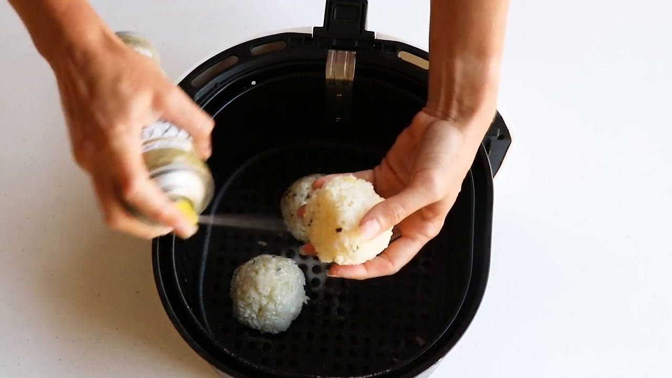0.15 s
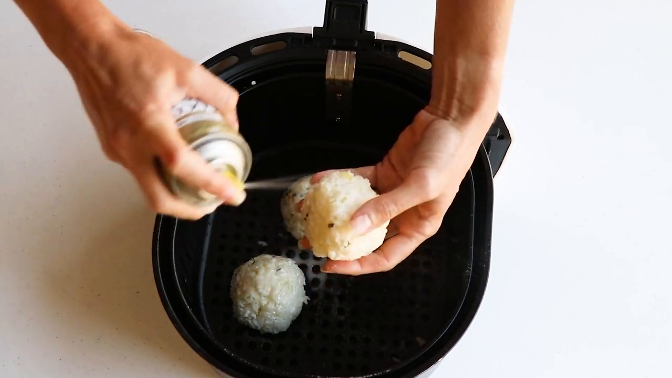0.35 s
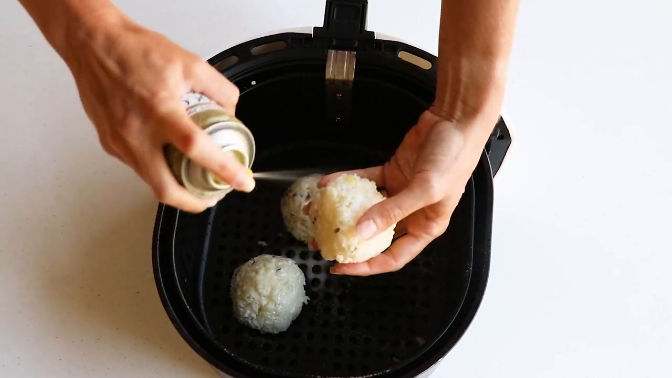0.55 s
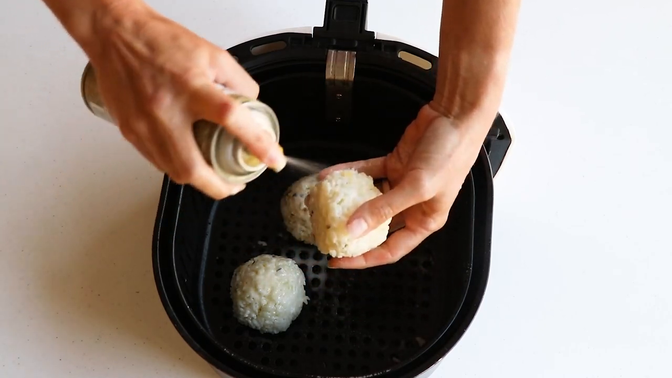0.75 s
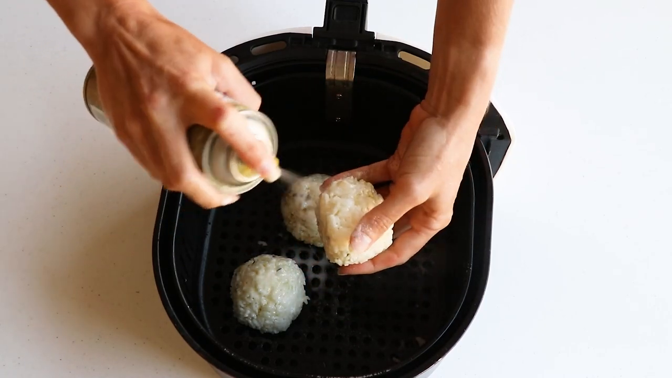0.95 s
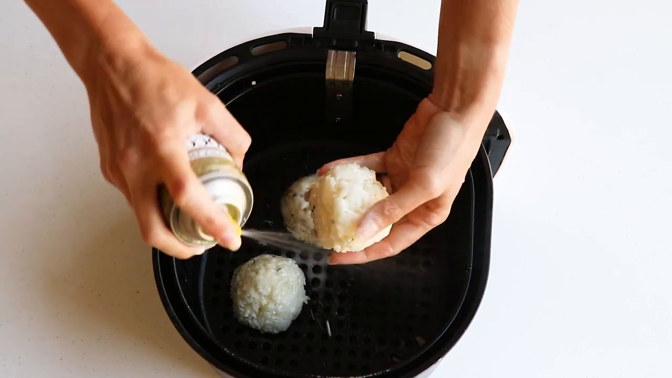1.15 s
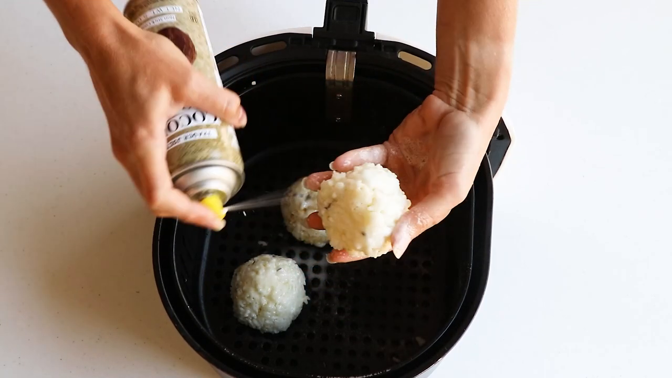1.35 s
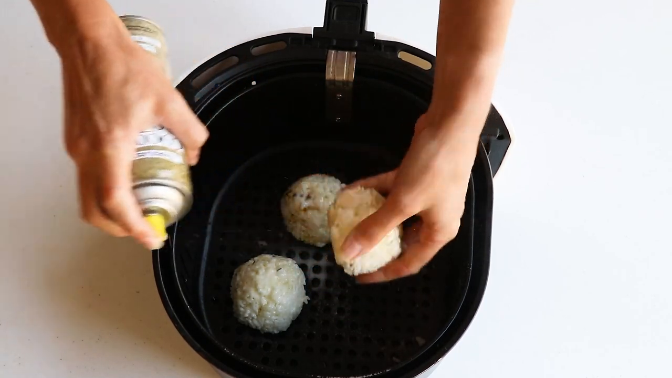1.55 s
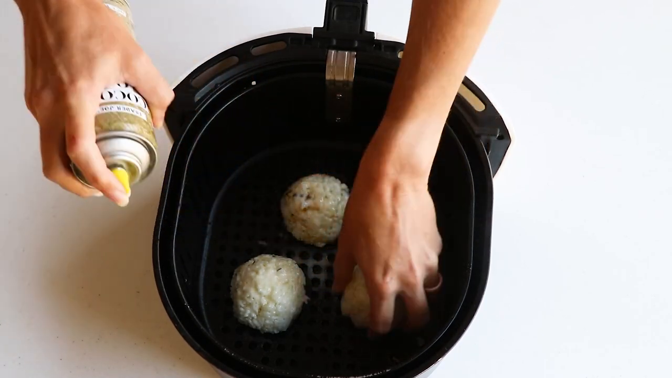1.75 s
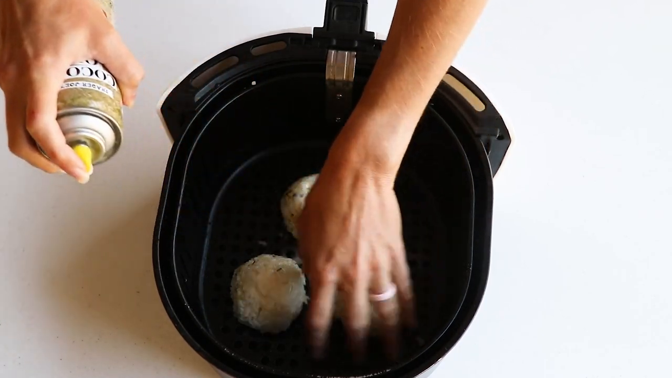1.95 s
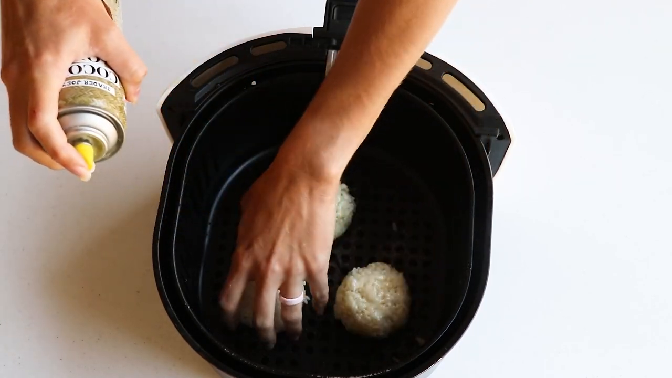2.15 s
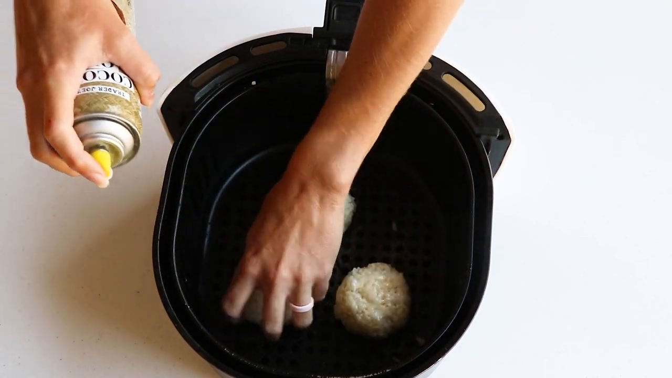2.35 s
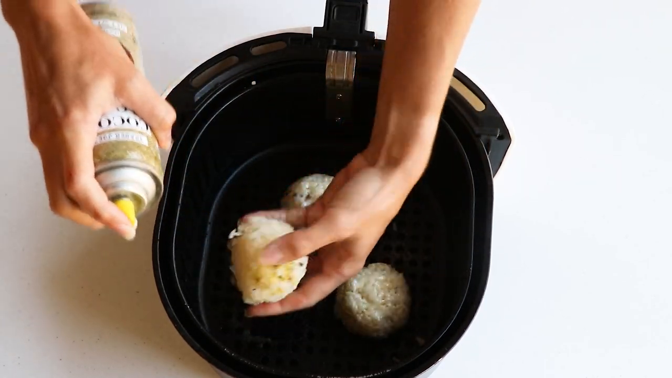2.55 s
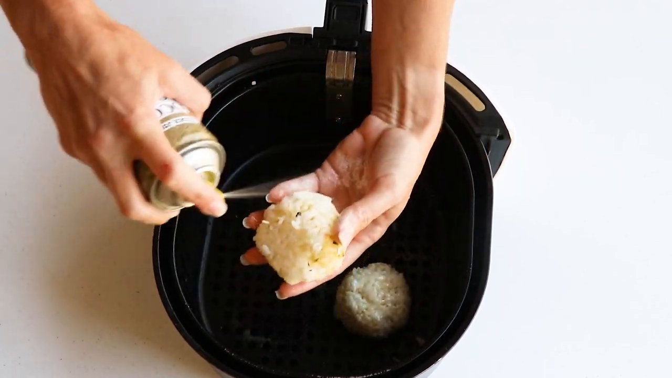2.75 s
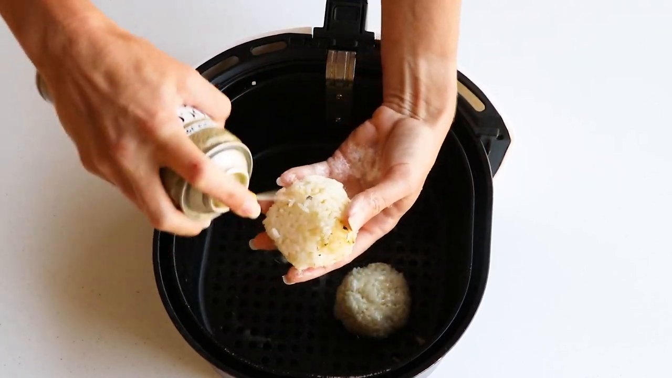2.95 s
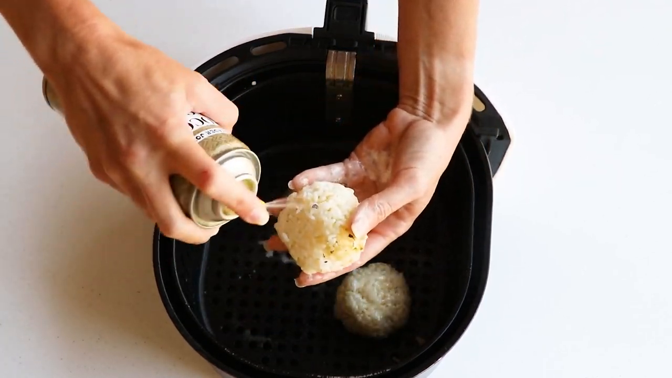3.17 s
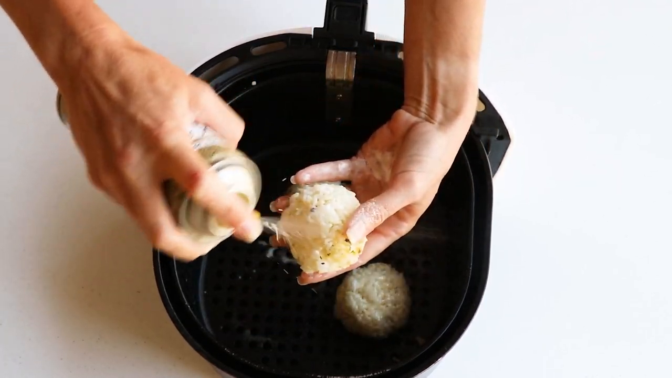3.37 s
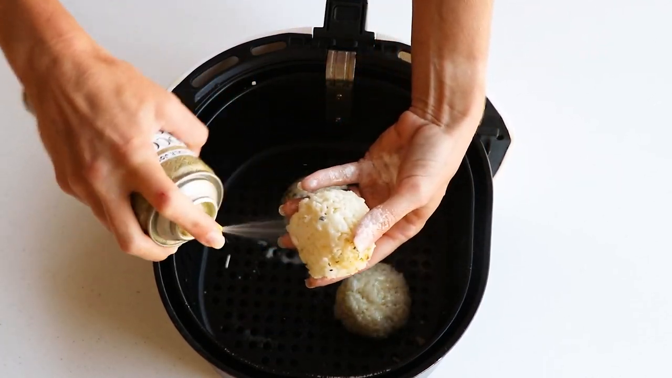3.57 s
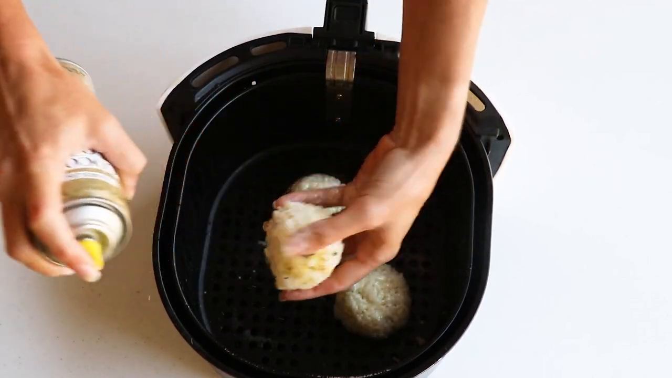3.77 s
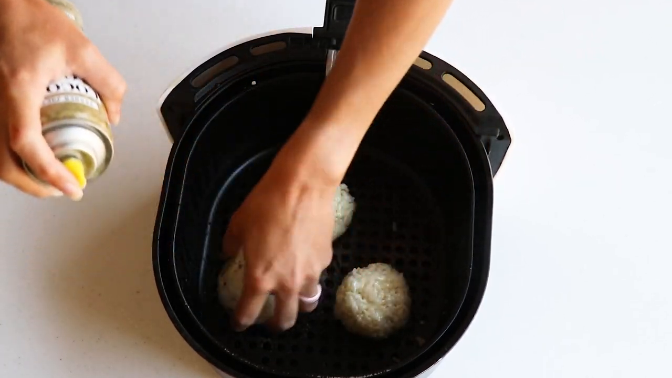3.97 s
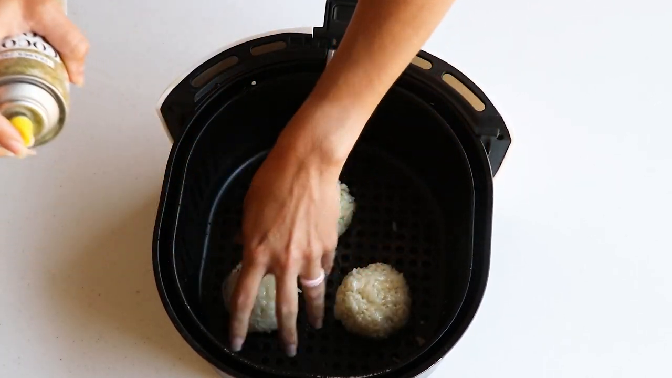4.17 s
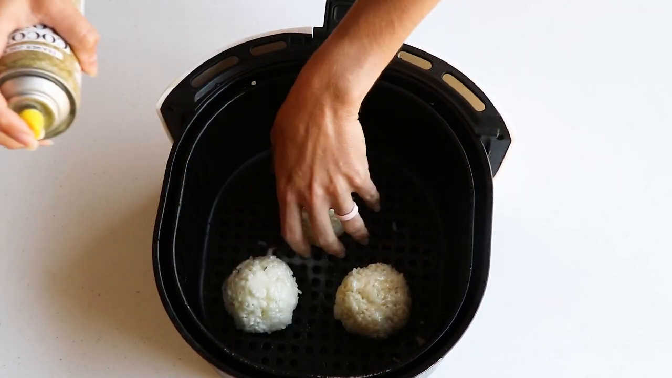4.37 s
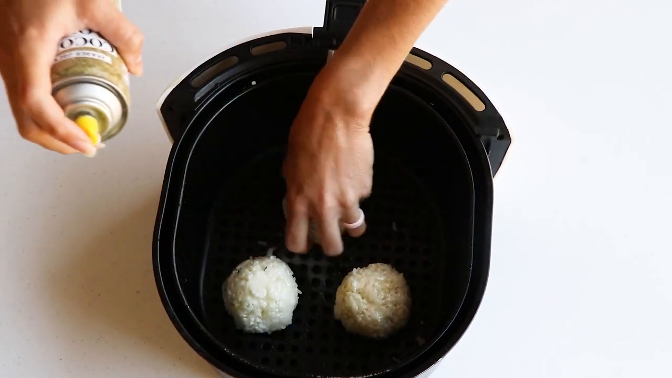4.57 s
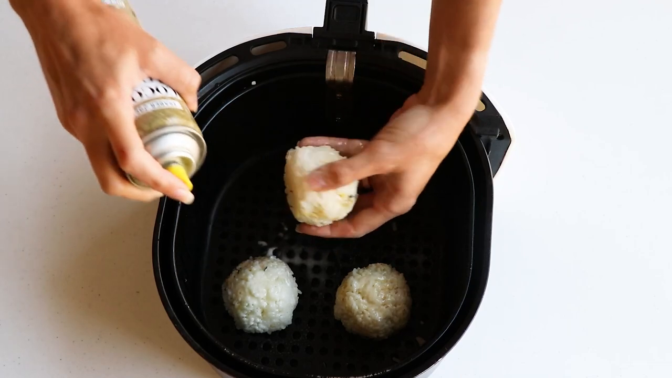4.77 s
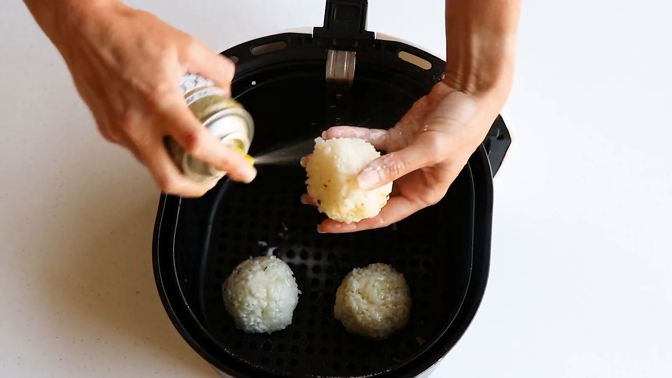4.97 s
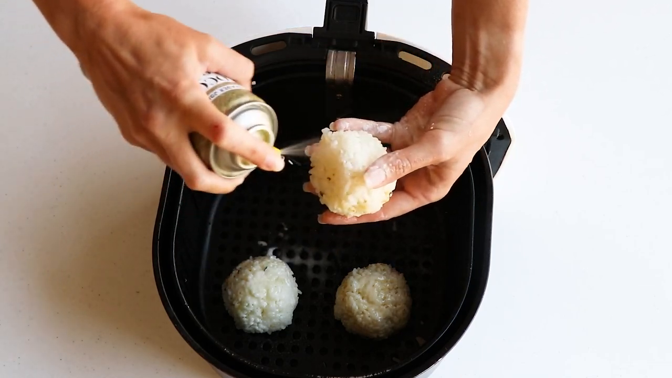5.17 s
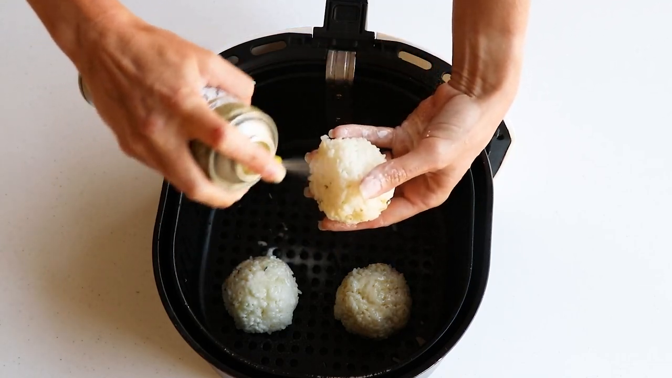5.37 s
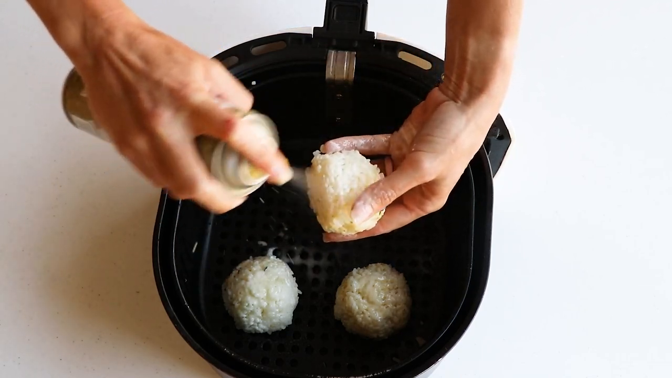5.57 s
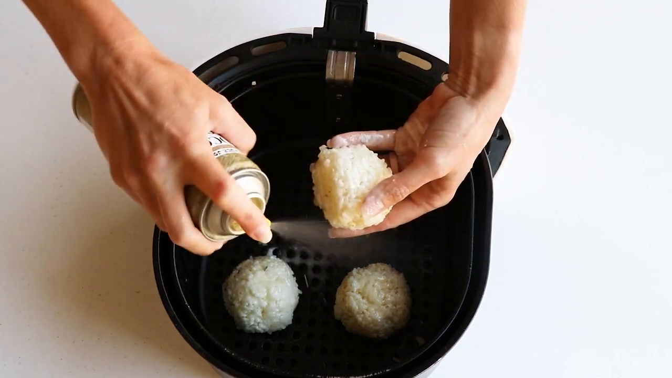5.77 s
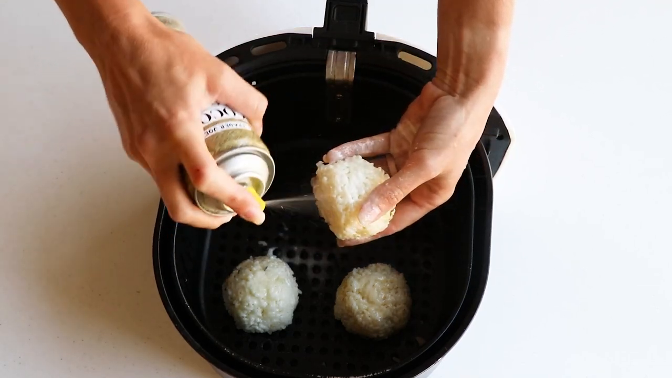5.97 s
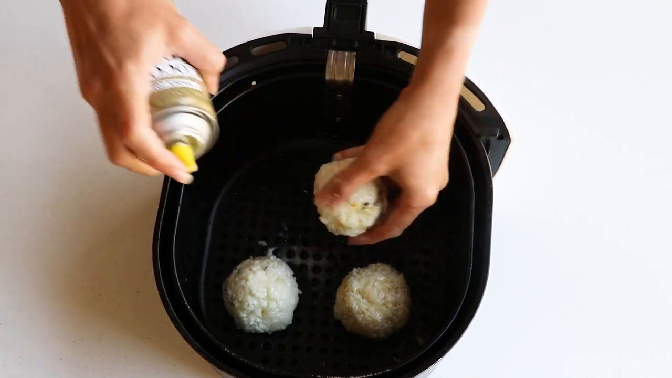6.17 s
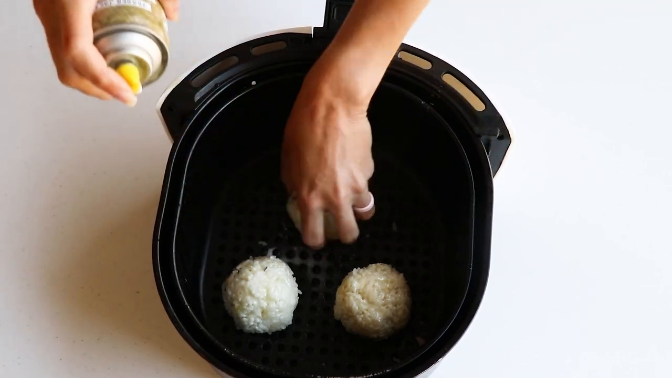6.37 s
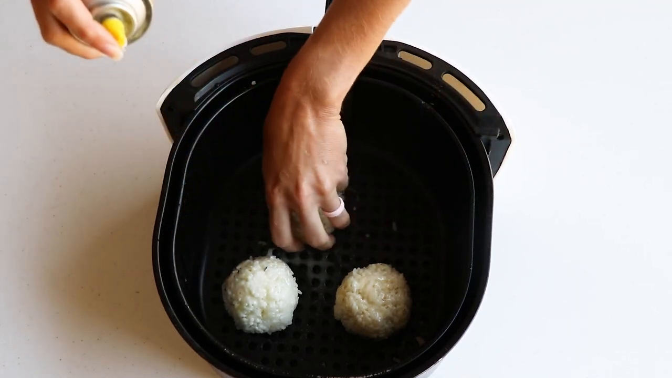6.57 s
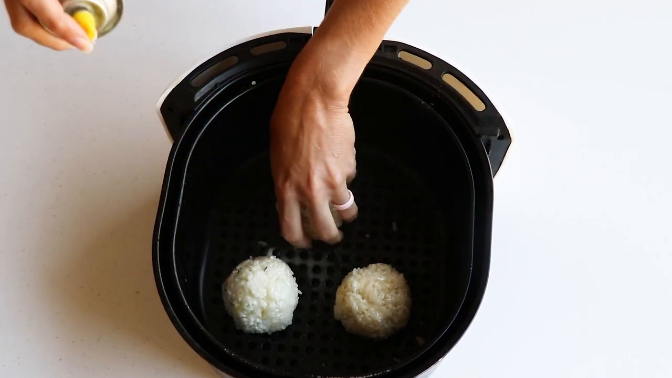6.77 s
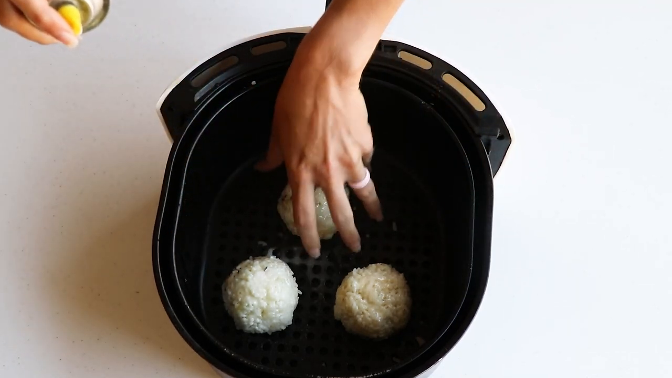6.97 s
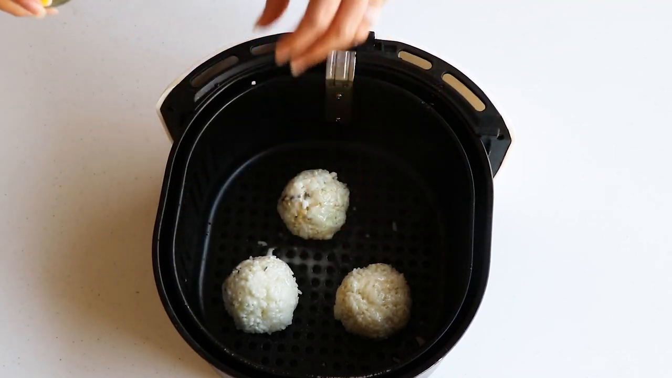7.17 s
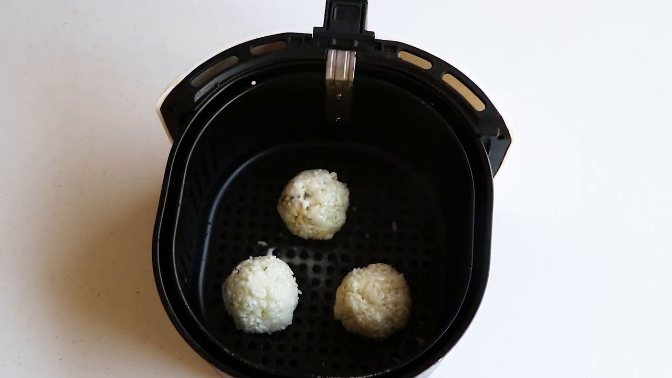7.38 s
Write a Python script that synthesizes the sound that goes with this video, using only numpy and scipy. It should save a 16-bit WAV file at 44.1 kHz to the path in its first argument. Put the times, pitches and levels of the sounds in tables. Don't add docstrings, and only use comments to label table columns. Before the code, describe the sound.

Close up, an aerosol can of cooking oil sprays three times, a bright hiss broken by wet sputters and hollow tube gurgles. After each spray, rice balls set down make the loose metal tray knock, crack and rattle against the basket. The last knocks fade into a faint, oily finger rub. A fridge hums low throughout in a small hard-walled kitchen, lightly reverberant, with a close stereo microphone.

```python
import sys
import numpy as np
from scipy import signal
from scipy.fft import rfft, irfft, next_fast_len
from scipy.io import wavfile
from scipy.ndimage import uniform_filter1d, map_coordinates

SR = 44100
rng = np.random.default_rng(int(sys.argv[2]) if len(sys.argv) > 2 else 0)


def output_pcm(signal):
    pcm = np.clip(np.atleast_2d(signal).T, -1, 1) * 32767
    wavfile.write(sys.argv[1], SR, np.round(pcm).astype(np.int16))


def amplitude_ratio(level_db):
    exponent = np.asarray(level_db, float) / 20
    return 10 ** exponent


N = 327663
TIME = np.arange(N) / SR
FAST_N = next_fast_len(N)

# (opens [s], shuts [s], jet hiss [dB], steady gurgle [dB], closing t60 [s])
PRESSES = [
    (0.024, 1.61, -31.5, -47.5, 0.27),
    (2.741, 3.747, -32, -45.5, 0.2),
    (4.938, 6.17, -32, -48, .17),
]
# (time [s], peak level [dB], length [s], extra bottom [dB])
SLUGS = [(0.033, -35.5, 0.039, -10), (0.103, -29.5, 0.022, -9), (0.2, -33.5, 0.013, -2),
         (0.2415, -31.5, 0.016, -5), (0.388, -30, 0.011, 0), (1.002, -27, 0.053, 2.5),
         (1.066, -27, 0.024, 4.5), (1.14, -27.5, 0.053, -1), (1.188, -32, 0.028, 9.2),
         (1.283, -29, 0.045, 6.5), (1.4, -49, 0.021, -5), (1.527, -29.5, 0.028, 9), (1.621, -40, 0.04, -8),
         (2.75, -34.5, 0.038, -7), (2.87, -30.5, 0.01, 4), (3.351, -28.5, 0.064, 2.5),
         (3.465, -26.5, 0.037, 2), (3.524, -26.5, 0.026, 3), (3.549, -27, 0.051, 2.5),
         (3.644, -30, 0.021, 1), (3.744, -33.5, 0.031, 5),
         (4.945, -32.5, 0.037, -1), (4.98, -27, 0.022, 3), (5.039, -31.5, 0.017, -14),
                (5.091, -27, 0.041, 6.5), (5.149, -30.5, 0.023, -6), (5.225, -28, 0.058, 2.5),
                (5.342, -29.5, 0.032, 5), (5.424, -28, 0.068, 1), (5.519, -26.5, 0.012, -16),
                (5.574, -29, 0.064, 3.5), (5.66, -27.5, 0.054, -8), (5.802, -29, 0.06, -11),
                (5.85, -30, 0.056, 3.5), (5.92, -25.5, 0.024, 4), (6.02, -34, 0.1, 1.5),
                (6.143, -34, 0.032, 7.5)]
# (time [s], peak level [dB], length [s])
GAS_PUFFS = [
    (1.002, -29, .012),
    (1.4, -38, 0.036),
    (1.792, -50, .006),
    (4.946, -34, .01),
    (5.66, -27, 0.034),
]
# (frequency [Hz], level per Hz [dB])
JET_SPECTRUM = [(900, -52), (1500, -21), (2060, -11), (2770, -11.5), (3660, -8.5), (4240, -5.5), (6060, -2),
                (8740, -0.5), (9700, -6), (11100, -8), (12500, -4.5), (14000, 0), (15700, -2)]
# (frequency [Hz], width [Hz], lift above the hiss [dB])
NOZZLE_WHISTLES = [(9130, 1380, 8.5), (4250, 160, 1.5), (7400, 430, 2)]
# (frequency [Hz], level per Hz [dB])
SPUTTER_SPECTRUM = [(240, -55), (400, -9.5), (1030, -8.5), (1460, -7), (1820, -3.5), (4240, 2), (5030, 2),
                    (8760, -6.5), (16000, -4)]
# (frequency [Hz], width [Hz], lift above the gurgle [dB])
TUBE_RESONANCES = [(765, 660, 8.5), (1457, 246, 9), (2050, 310, 8.5), (2864, 53, 7.5), (3260, 68, 8.5),
                   (3910, 750, 4), (4530, 250, 4.5), (5500, 190, -1), (6000, 250, 6), (7050, 300, 4.5)]
# (time [s], peak level [dB], fade t60 [s], hardness as extra top [dB],
# basket mode nearest the blow [Hz])
KNOCKS = [(1.761, -40, 0.28, 2, 296), (1.9, -38, 0.15, 5, 490), (1.968, -45.5, 0.15, 7, 536),
          (2.3032, -25, 0.16, 4, 630), (2.323, -27.5, 0.087, 2, 820), (2.348, -31.5, 0.43, -5, 401),
          (2.4074, -38.5, 0.13, 2, 834), (2.4444, -45, 0.22, -5, 358), (4.0392, -44.5, 0.12, -7, 295),
          (4.0794, -49, 0.15, -2, 293), (4.13, -36, 0.22, 2.5, 331), (4.2474, -50.5, 0.13, 6, 307),
          (4.514, -21.5, 0.061, 5, 500), (4.5416, -27.5, 0.14, -1.5, 310), (4.575, -28, 0.23, 2.5, 514),
          (4.658, -34, 0.14, -3.5, 305), (4.6994, -47, 0.2, -14, 310), (6.3869, -52, 0.04, 8, 495),
          (6.458, -27, 0.092, 2.5, 494), (6.49, -32.5, 0.26, -5, 460), (6.558, -50, 0.3, -7, 522)]
# (frequency [Hz], level per Hz [dB])
CRACK_SPECTRUM = [(120, -40), (400, -9), (900, 4), (1850, 3), (3260, 0.5), (5500, -3.5), (8700, -7),
                  (10000, -15), (15500, -36)]
# (frequency [Hz], level [dB], t60 [s])
TRAY_MODES = [(1454, -14.5, 0.063), (2070, -27, 0.055), (2600, -20, 0.032), (3230, -21, 0.035),
              (3750, -34, .04), (4340, -23, 0.034), (4890, -17, .04), (5560, -12, 0.024), (7150, -30, .04)]
# (frequency [Hz], level [dB], t60 [s])
BASKET_MODES = [(212, 0.5, 0.24), (310, 1, 0.13), (412, -6, 0.13), (460, -9, 0.29), (520, 2, 0.083),
                (643, 5, 0.024), (830, 2.5, 0.13), (1046, -27, 0.065), (1126, -1, 0.22)]
# (time [s],
# frequency [Hz], level [dB], t60 [s])
PINGS_AND_RUMBLES = [(2.322, 2600, -39, 0.039), (2.322, 830, -49, 0.12), (2.35, 2600, -41, 0.078),
                     (2.40, 830, -47, 0.39), (4.133, 2620, -55, .08), (4.518, 2600, -39, .05),
                     (4.52, 678, -36, 0.11), (4.524, 830, -34, .1), (4.539, 460, -38, 0.092),
                     (4.575, 5500, -39, .04), (6.1, 4430, -33, .04), (4.585, 3750, -40, .07),
                     (6.482, 520, -37.5, 0.044), (2.33, 38, -51, .8), (4.53, 44.8, -51, .7),
                     (6.501, 32.1, -47, 0.55), (6.545, 520, -42, 0.12)]
# (time [s], level [dB])
FINGER_RUB = [
    (6.85, -81),
    (6.908, -76),
    (7.044, -60.5),
    (7.384, -65),
    (7.422, -60),
    (7.43, -78),
]
# (frequency [Hz], t60 [s])
KITCHEN_T60 = [(200, 0.94), (1000, 0.61), (5000, 0.48), (14000, 0.16)]
# (frequency [Hz], level per Hz [dB])
AIR_SPECTRUM = [(12, -35), (20, -7.5), (59, -6), (90, -5), (151, -7.5), (229, 0.5), (347, -1.5), (484, -6),
                (700, -8), (1080, -13), (1550, -16), (2340, -22.5), (8000, -24.5), (15000, -26)]
# (frequency [Hz], rms level [dB])
FRIDGE_HUM = [(59.2, -61.5), (177.6, -65), (269.2, -79), (296.1, -64), (355.3, -58.5), (414.5, -65),
              (484.5, -63), (532.9, -61.5), (716.0, -62)]


def rms_one(x):
    return x / np.sqrt(np.mean(x ** 2) + 1e-20)


def at_hz(points, hz):
    point_hz, values = np.transpose(points)
    return np.interp(np.log(hz + 1), np.log(point_hz), values)


def coloured(spectrum, peaks=(), source=None):
    hz = np.fft.rfftfreq(FAST_N, 1 / SR)
    lift_db = sum(db / (1 + (2 * (hz - peak_hz) / width) ** 2) for peak_hz, width, db in peaks)
    source = rng.standard_normal(FAST_N) if source is None else source
    shaped = rfft(source, FAST_N) * amplitude_ratio(at_hz(spectrum, hz) + lift_db)
    return rms_one(irfft(shaped, FAST_N)[:N])


def filtered(x, order, hz, kind="low"):
    return signal.sosfilt(signal.butter(order, hz, kind, fs=SR, output="sos"), x)


def drift(rate_hz):
    r = np.exp(-2 * np.pi * rate_hz / SR)
    wander = signal.lfilter([1], [1, -2 * r, r * r], rng.standard_normal(N + SR))
    return rms_one(wander[SR:])


def burst(s, length, t60, rise):
    shape, start = np.zeros(N), round(s * SR)
    age = TIME[:min(SR // 2, N - start)]
    fade = amplitude_ratio(-60 * np.maximum(age - length, 0) / max(t60, 0.005))
    shape[start:start + len(age)] = np.clip(age / rise, 0, 1) * fade
    return shape


def bursts(rows, noise, split_hz, rise):
    low = filtered(noise, 2, split_hz[0])
    high = filtered(noise, 2, split_hz[1], "high")
    rows = np.array(rows)
    shapes = np.array([burst(s, length, t60, rise) for s, _, length, t60 in rows[:, :4]]) ** 2
    peak_db, top_db, bottom_db = rows[:, 1], rows[:, 4], rows[:, 5]
    thirds_db = peak_db + [bottom_db, 0 * bottom_db, top_db]
    gains = np.sqrt(amplitude_ratio(thirds_db) ** 2 @ shapes)
    return gains[0] * low + gains[1] * (noise - low - high) + gains[2] * high


def ring(drive, modes):
    out = 0
    for hz, db, t60 in modes:
        r, w = amplitude_ratio(-60 / (t60 * SR)), 2 * np.pi * hz / SR
        push = [0, amplitude_ratio(db) * np.sin(w)]
        out = out + signal.lfilter(push, [1, -2 * r * np.cos(w), r * r], drive + 1e-18)
    return out


def spitting(per_s, spread_db):
    hits = rng.random(N) < per_s / SR
    sizes = amplitude_ratio(spread_db * np.minimum(rng.exponential(1, N), 3))
    drops = hits * sizes * rng.choice([-1, 1], N)
    return rng.standard_normal(N) + drops


def patchy(x, depth_db, frames, bins):
    cells = signal.stft(x, nperseg=512)[2]
    swell = uniform_filter1d(rng.standard_normal(cells.shape), size=bins, axis=0)
    swell = uniform_filter1d(swell, size=frames, axis=1)
    return rms_one(signal.istft(cells * amplitude_ratio(depth_db * rms_one(swell)), nperseg=512)[1][:N])


def valve(column, grows_db_per_s=0, t60=None):
    open_s, closing_curve = 0.01, 1.4
    gain = 0
    for row in PRESSES:
        opens, shuts = row[:2]
        held_db = row[column] + grows_db_per_s * (np.clip(TIME, opens, shuts) - (opens + shuts) / 2)
        closing_db = -60 * (np.maximum(TIME - shuts, 0) / (t60 or row[4])) ** closing_curve
        gain = gain + np.clip((TIME - opens) / open_s, 0, 1) ** 2 * amplitude_ratio(held_db + closing_db)
    return gain


def slug_rows():
    fade_s, fade_per_length, top_db = 0.029, 1.8, 0.5
    return [(s, db, length, fade_s + fade_per_length * length, top_db, bottom_db)
            for s, db, length, bottom_db in SLUGS]


def jet():
    hiss = coloured(JET_SPECTRUM, NOZZLE_WHISTLES, spitting(per_s=2100, spread_db=-2.0))
    hiss = patchy(hiss, depth_db=1.86, frames=6, bins=10)
    hiss = patchy(hiss, depth_db=1.7, frames=16, bins=3)
    flutter_db = 0.78 * drift(15) + 0.43 * drift(68)
    slug_drive_db = -11
    power = valve(column=2) ** 2
    for s, db, length, t60, *_ in slug_rows():
        power = power + (amplitude_ratio(db + slug_drive_db) * burst(s, length, t60, rise=0.0046)) ** 2
    for s, db, length in GAS_PUFFS:
        power = power + (amplitude_ratio(db) * burst(s, length, t60=0.06, rise=0.0055)) ** 2
    return np.sqrt(power) * amplitude_ratio(flutter_db) * hiss


def sputter():
    tube = coloured(SPUTTER_SPECTRUM, TUBE_RESONANCES, spitting(per_s=900, spread_db=2.5))
    tube = patchy(tube, depth_db=2.54, frames=12, bins=3)
    slugs = bursts(slug_rows(), tube * amplitude_ratio(1.1 * drift(57)), split_hz=(1200, 3600), rise=0.0036)
    flow = valve(column=3, grows_db_per_s=8, t60=0.54)
    gurgle = flow * coloured(SPUTTER_SPECTRUM, TUBE_RESONANCES)
    return amplitude_ratio(-5) * slugs + amplitude_ratio(-4.5) * gurgle


def echoes(x):
    out = x
    for lag_ms, wander_ms, db in [(0.719, 0.029, -12), (2.9, 0.1, -12)]:
        lag = (lag_ms + wander_ms * drift(1.265)) * SR / 1000
        out = out + amplitude_ratio(db) * map_coordinates(x, [np.arange(N) - lag], order=3)
    return out


def knocks():
    chatter = spitting(per_s=460, spread_db=4.0)
    rattles = [(s, db, 0.014, t60, top_db, 0.1) for s, db, t60, top_db, _ in KNOCKS]
    crack = bursts(rattles, coloured(CRACK_SPECTRUM, (), chatter), split_hz=(1200, 3500), rise=0.0006)
    pushes = chatter * np.array([burst(row[0], 0.015, 0.063, 0.0072) for row in KNOCKS])
    _, peak_db, _, hardness_db, struck_hz = np.transpose(KNOCKS)
    thud_db = peak_db - 5.5 - 0.95 * hardness_db
    thud = 0
    for mode in BASKET_MODES:
        octaves_off = np.abs(np.log2(mode[0] / struck_hz))
        strength = amplitude_ratio(thud_db - 9.5 * octaves_off)
        thud = thud + ring(strength @ pushes, [mode])
    thud = filtered(thud, 2, 140, "high")
    return amplitude_ratio(-13.0) * crack + amplitude_ratio(-37.5) * ring(crack, TRAY_MODES) + amplitude_ratio(-31.5) * thud


def ticks():
    snap = coloured([(1200, -23), (3000, 4), (5000, 9), (9000, -17), (15500, -11)])
    return snap * sum(amplitude_ratio(db + hardness_db - 15.5) * burst(s, 0.0034, 0.064, 0.00026)
                      for s, db, _, hardness_db, _ in KNOCKS)


def pings():
    rings = sum(amplitude_ratio(db) * burst(s, 0.014, t60, 0.0016) * np.sin(2 * np.pi * hz * TIME)
                for s, hz, db, t60 in PINGS_AND_RUMBLES)
    return rings * amplitude_ratio(5.1 * drift(38))


def rub():
    skin = coloured([(900, -20), (1800, 3), (5000, -6), (8000, -3), (11000, -16)], [(1860, 78, 13)])
    s, db = np.transpose(FINGER_RUB)
    slide_db = np.interp(TIME, [*s, s[-1] + 0.3], [*db, db[-1] - 40], left=-200, right=-200)
    return amplitude_ratio(slide_db) * skin


def kitchen(x):
    age, tail = TIME[:SR] - 0.006, 0
    for hz in 125 * 2.0 ** np.arange(7):
        t60 = at_hz(KITCHEN_T60, hz * np.sqrt(2))
        octave = filtered(rng.standard_normal(SR), 2, [hz, min(2 * hz, 0.45 * SR)], "band")
        tail = tail + octave * (age > 0) * amplitude_ratio(-60 * age / t60) / np.sqrt(t60)
    return signal.fftconvolve(x, tail / np.sqrt(np.sum(tail ** 2)))[:N]


def background():
    hum = 0
    for hz, db in FRIDGE_HUM:
        level = amplitude_ratio(db - 2.5 + 2.7 * drift(2.9)) * np.sqrt(2)
        hum = hum + level * np.sin(2 * np.pi * hz * TIME + 1.14 * drift(3.1))
    return amplitude_ratio(-50.5) * coloured(AIR_SPECTRUM) + hum


def scene():
    near = amplitude_ratio(0.2) * echoes(jet() + sputter()) + knocks() + ticks() + rub()
    mid = near + pings() + amplitude_ratio(-7.5) * kitchen(near) + background()
    side = amplitude_ratio(-62.5) * coloured([(60, 4.5), (600, -1.0), (3000, -0.066), (15000, -1.0)])
    return np.array([mid + side, mid - side])


def band_limit(x):
    return signal.sosfilt(signal.butter(12, 16650, fs=SR, output="sos"), x)


def record(dry):
    mid, side = (dry[0] + dry[1]) / 2, (dry[0] - dry[1]) / 2
    treble = signal.butter(4, 900, "high", fs=SR, output="sos")
    loud = uniform_filter1d(signal.sosfilt(treble, mid) ** 2, size=1024) > amplitude_ratio(-44.5) ** 2
    side = side - uniform_filter1d(loud * 1.0, size=512) * signal.sosfiltfilt(treble, side)
    rounded = 0.4 * np.tanh(np.array([mid + side, mid - side]) / 0.4)
    passed = np.fft.rfftfreq(FAST_N, 1 / SR) < 15760
    mix = irfft(rfft(rounded, FAST_N) * passed, FAST_N)[:, :N]
    return band_limit(mix)


dry = scene()
out = record(dry)
output_pcm(out)
```